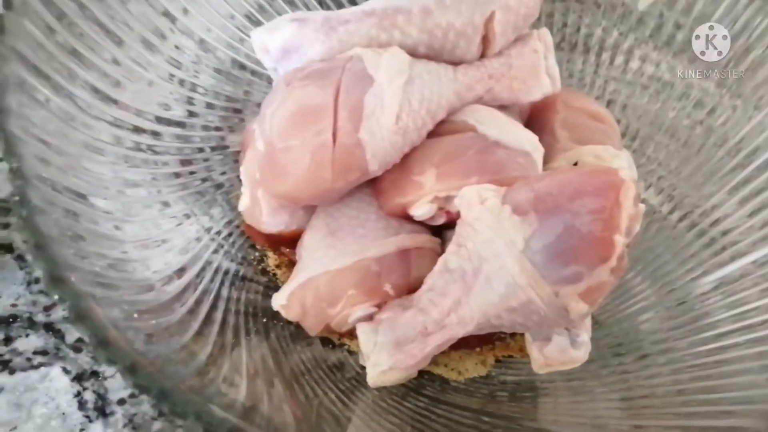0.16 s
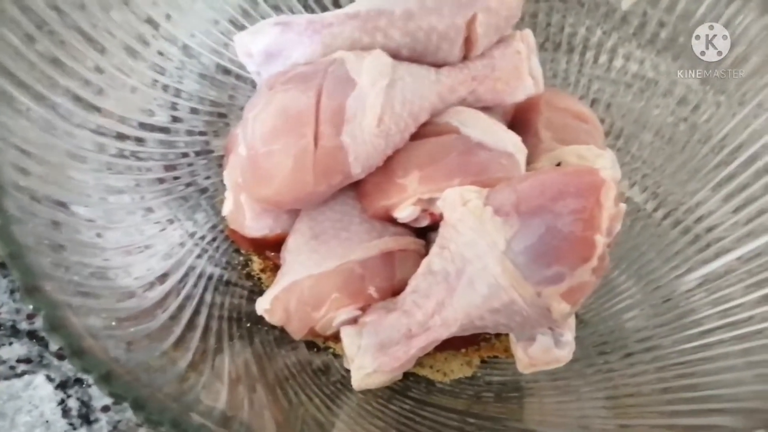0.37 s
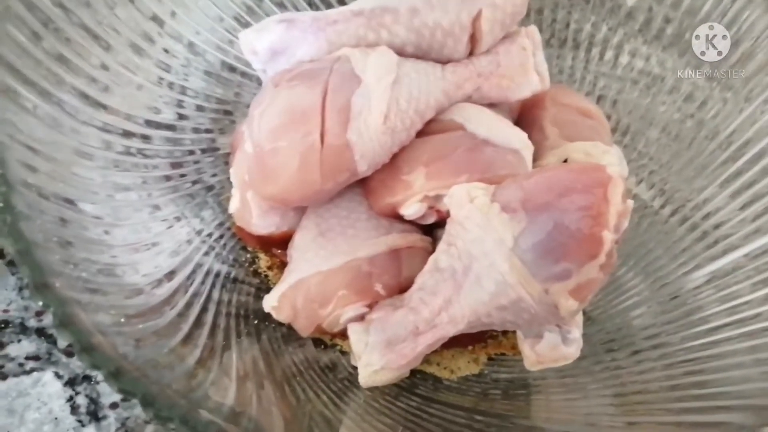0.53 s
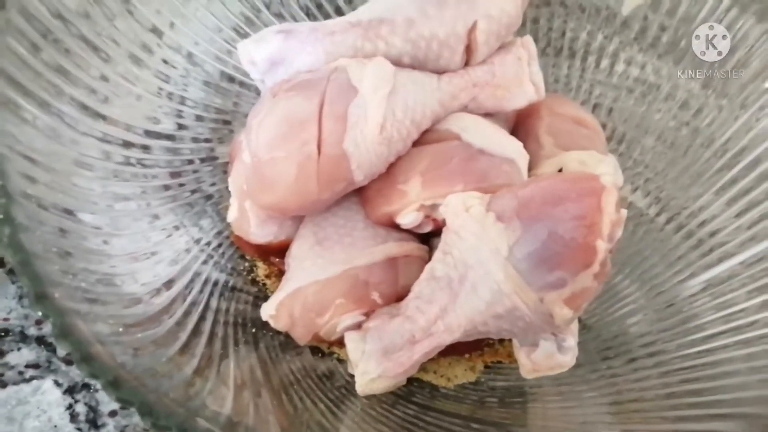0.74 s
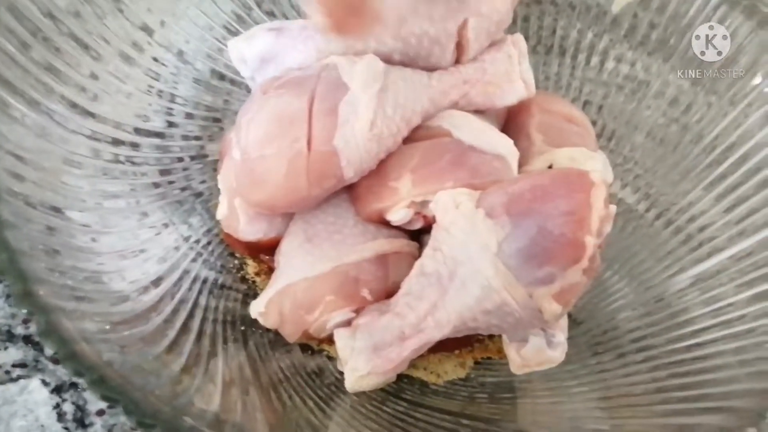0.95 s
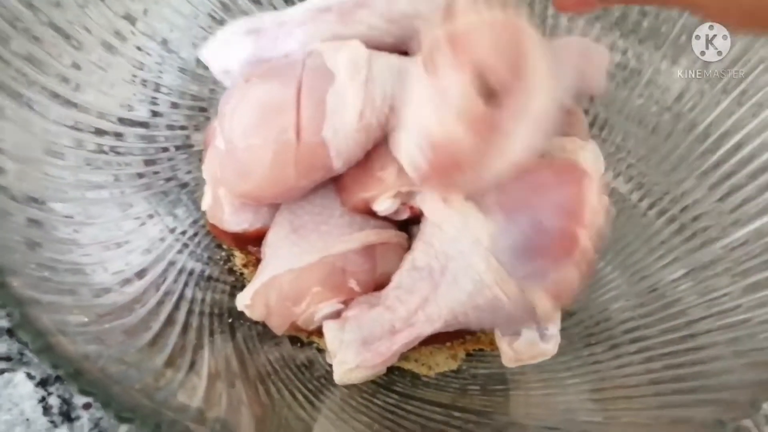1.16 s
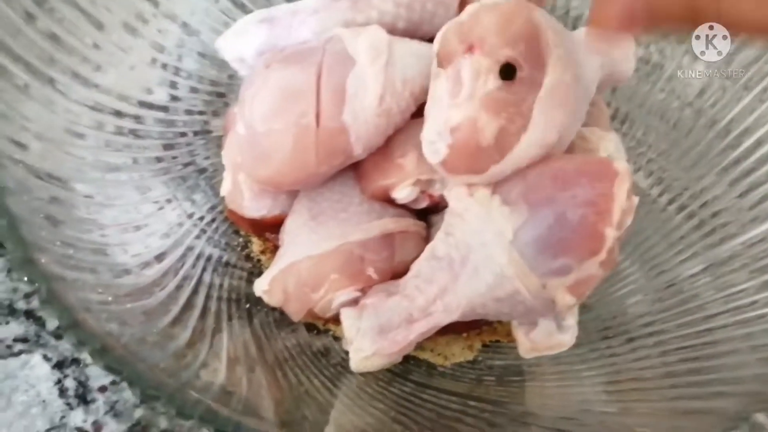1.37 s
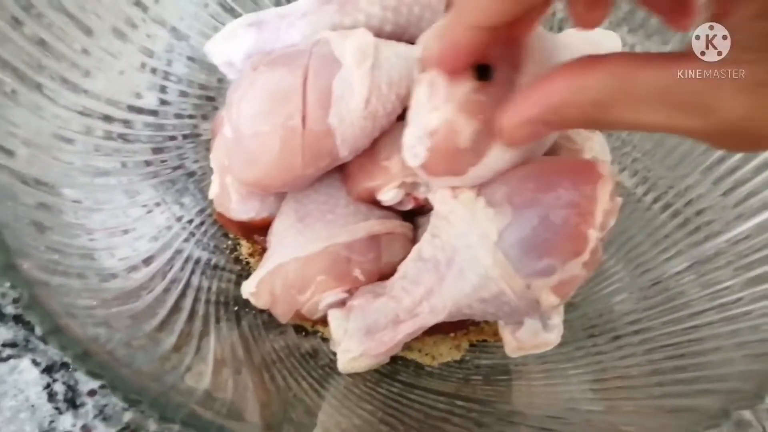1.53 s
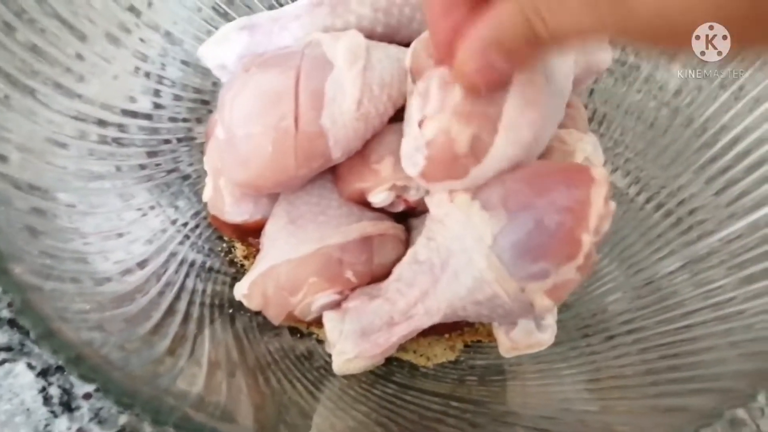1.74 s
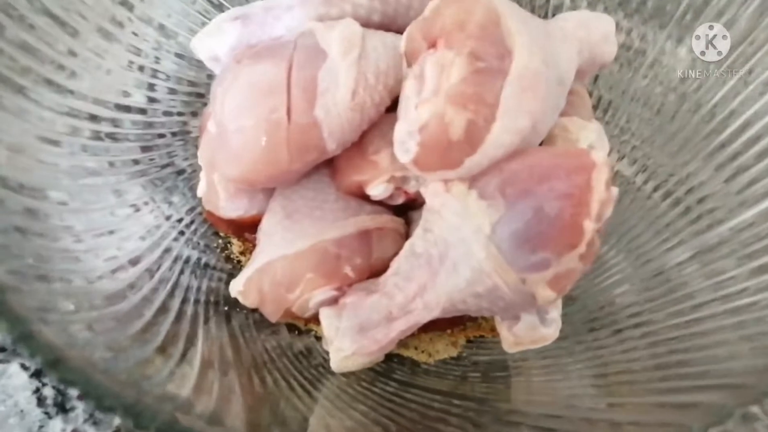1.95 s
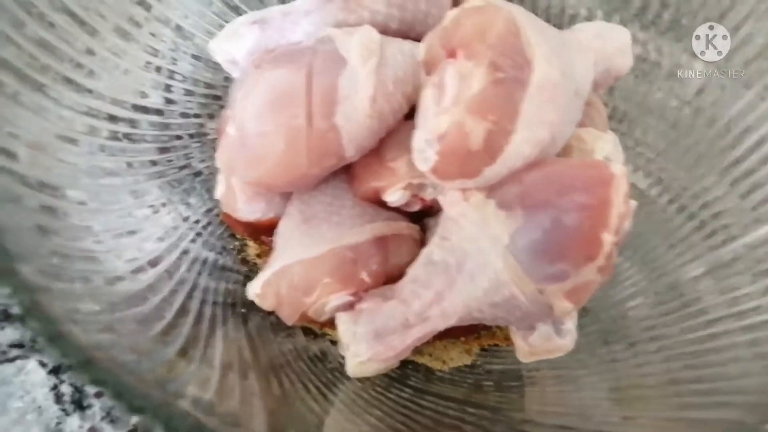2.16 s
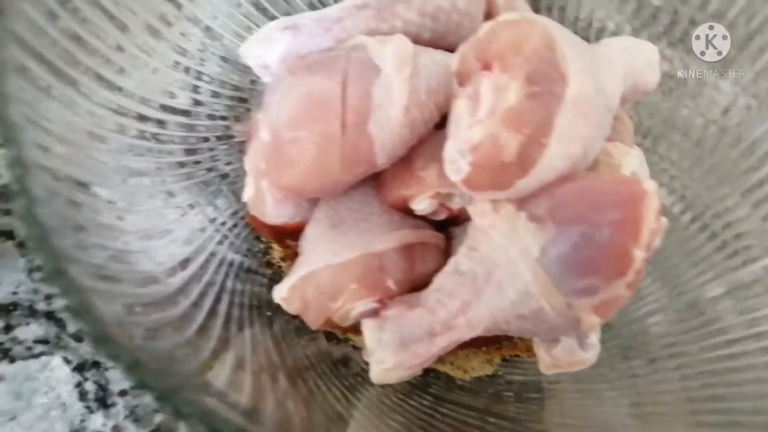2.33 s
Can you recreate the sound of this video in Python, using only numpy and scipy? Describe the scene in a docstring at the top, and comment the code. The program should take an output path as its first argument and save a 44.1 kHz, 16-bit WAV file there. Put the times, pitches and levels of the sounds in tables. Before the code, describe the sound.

Raw chicken pieces knock hollowly against a glass bowl in an echoing kitchen.

```python
"""Raw chicken into a glass bowl

A hard, echoing kitchen, heard in stereo from near the bowl, with a motor humming steadily underneath.
As the chicken is set in, two hollow knocks ring on in the room and a softer one follows. A piece then
lands on the pile with a tink of the glass and a soft thud; wet skin ticks and crackles as the hand
lets go."""
import sys
import numpy as np
from scipy import signal
from scipy.fft import rfft, irfft, next_fast_len
from scipy.io import wavfile
from scipy.ndimage import map_coordinates

SR = 44100
rng = np.random.default_rng(int(sys.argv[2]) if len(sys.argv) > 2 else 0)


def digitize_waveform(pressure):
    """Quantize a signal to 16-bit integers and store it at the path in sys.argv[1].

    Rows of a 2-D input are taken as channels; values are limited to [-1, 1].
    """
    field = np.atleast_2d(pressure).T
    bounded = np.clip(field, -1, 1)
    quanta = np.round(bounded * 32767).astype(np.int16)
    wavfile.write(sys.argv[1], SR, quanta)


N = 110250

# hollow resonances of a knock (frequency [Hz], bandwidth [Hz], level [dB])
KNOCK_MODES = [(484, 110, -8.5), (728, 205, 0.5), (1047, 200, -1), (1400, 400, -17.5), (1850, 280, -10.5),
               (2750, 400, -21.5), (5274, 830, -23), (6340, 900, -27.5), (7700, 900, -36)]
# how long the kitchen's echo holds before it fades (frequency [Hz], hold [s])
ECHO_HOLD = [(300, .2), (850, 0.29), (2500, 0.15), (5500, 0.031), (10000, .03)]
# where the echo and the crack of contact sit in the image (frequency [Hz], left over right [dB])
ROOM_BALANCE = [(300, 4.5), (750, -6), (1200, -5), (3000, 0.5), (6000, -9.5), (10000, -2.5)]
# likeness of the two channels for diffuse sound (frequency [Hz], correlation [0-1])
DIFFUSE = [(200, 0.21), (700, 0.096), (1500, 0), (8000, 0.069)]
# the same for sound that is more centred in the bass (frequency [Hz], correlation [0-1])
CENTRED = [(60, 0.59), (290, 0.36), (640, 0.27), (1400, 0.1)]

SOFT_RISE_S, SHARP_RISE_S = 0.0019, 0.0001
WALL_DELAY_S = 0.0081  # first reflections reach the microphone this much after the direct sound


def amp(db):
    """Decibels to gain."""
    return 10 ** (np.asarray(db) / 20)


def along(points, hz):
    """Read (frequency, value) points at hz on a log axis."""
    freqs, values = np.transpose(points)
    return np.interp(np.log(hz + 1), np.log(freqs + 1), values)


def band(hz, centre_hz, octaves):
    """A bell of gain around a centre frequency."""
    return np.exp(-(np.log2((hz + 1) / centre_hz) / octaves) ** 2)


def sides(db):
    """Left and right gains, the left louder by db."""
    return amp(np.array([[1], [-1]]) * db / 2)


def since(s):
    """Seconds after the moment s, zero before it."""
    return np.maximum(np.arange(N) / SR - s, 0)


def burst(s, rise, t60):
    """An envelope that rises at s and dies away by 60 dB in t60 seconds."""
    t = since(s)
    return (1 - np.exp(-t / rise)) * 1000 ** (-t / t60)


def wobble(rate):
    """A smooth random curve, rate knots a second."""
    return map_coordinates(rng.standard_normal(1024), [np.arange(N) * rate / SR + 2], mode="wrap")


def filtered(x, response):
    """Pass x through a complex response of frequency."""
    size = next_fast_len(N + SR // 2)
    return irfft(rfft(x, size) * response(np.fft.rfftfreq(size, 1 / SR)), size)[..., :N]


def noise(colour, correlation):
    """Stereo noise of rms 1 with a given colour and correlation between the channels."""
    def mid_side_gains(hz):
        angle = np.arccos(np.clip(along(correlation, hz), -1, 1)) / 2
        return colour(hz) * np.array([np.cos(angle), np.sin(angle)])

    mid, side = filtered(rng.standard_normal((2, N)), mid_side_gains)
    stereo = np.array([mid + side, mid - side])
    return stereo / np.sqrt(np.mean(stereo ** 2) + 1e-20)


def motor_hum():
    """A motor hums at multiples of its slightly drifting speed, over a trace of mains hum."""
    # motor tones (multiple of the speed, level [dB], left over right [dB])
    harmonics = [(2, -63.5, -3), (3, -65, 1), (4, -71, -6.5), (5, -73, -5.5), (6, -68, -8), (7, -67, 1),
                 (8, -66.5, -4), (9, -64, -6.5), (10, -90, -2)]
    speed_hz, drift_hz, waver_db, mains_hz = 43.37, 0.077, 1.9, 100
    turns = np.cumsum(speed_hz + drift_hz * wobble(3)) / SR
    motor = np.zeros((2, N))
    for multiple, db, pan_db in harmonics:
        gain = amp(db + waver_db * wobble(4.88)) * sides(pan_db)
        motor += gain * np.sin(2 * np.pi * (round(multiple) * turns + rng.random()))
    mains = amp(-77) * np.sin(2 * np.pi * mains_hz * since(0))
    return np.sqrt(2) * (motor + mains)


def room_tone():
    """A low rush of air in the kitchen, a little to the right of the microphone."""
    # colour of the air (frequency [Hz], level [dB])
    spectrum = [(20, -5.5), (45, -3), (75, -6), (140, -3), (200, -14), (290, -0.5), (390, -1.5),
                (470, -13.5), (650, -18), (1200, -25), (2000, -26.5), (2900, -23.5), (3900, -31.5),
                (5400, -23.5), (8000, -35), (15000, -34.5)]
    # its place in the image (frequency [Hz], left over right [dB])
    balance = [(100, -9), (400, -4.5), (2000, -2), (10000, -1)]
    air = noise(lambda hz: amp(along(spectrum, hz)), CENTRED)
    return amp(-60.5) * filtered(air, lambda hz: sides(along(balance, hz)))


def skin_peel():
    """Sticky skin comes apart in a faint, clumpy crackle."""
    # colour of the crackle (frequency [Hz], level [dB])
    spectrum = [(350, -18), (620, 11), (1100, -14), (2100, -5), (3000, -7.5), (4000, -9), (5700, 4.5),
                (7500, -3.5), (9500, -21), (15000, -22.5)]
    start_s, start_db, fade_db_per_s, clump_db = 2.384, -58, 17, 3.5
    t = since(start_s)
    level_db = start_db - fade_db_per_s * t + clump_db * wobble(170)
    return (t > 0) * amp(level_db) * noise(lambda hz: amp(along(spectrum, hz)), DIFFUSE)


def skin_snaps():
    """Films of wet skin break with small bright ticks, each with a short echo."""
    # ticks (time [s], level [dB], t60 [s], centre [Hz], width [octaves], left over right [dB])
    ticks = [(1.181, -55.5, 0.073, 5630, 0.26, -2), (1.2431, -41, 0.011, 13040, 0.42, -2),
             (1.243, -52.5, 0.019, 5920, 0.94, -3.5), (1.6513, -37.5, 0.0054, 5680, .17, -4.5),
             (1.6522, -48, 0.0064, 8960, 0.16, -5.5), (1.854, -68.5, 0.019, 7430, 0.46, 1),
             (2.3776, -41.5, 0.033, 6400, .5, 0.5), (2.379, -51.5, 0.022, 2200, 0.57, 1)]
    out = np.zeros((2, N))
    for s, db, t60, centre_hz, octaves, pan_db in ticks:
        tick = noise(lambda hz: band(hz, centre_hz, octaves), DIFFUSE)
        envelope = burst(s, SHARP_RISE_S, t60) + amp(-15) * burst(s, SHARP_RISE_S, t60=0.044)
        out += amp(db) * sides(pan_db) * envelope * tick
    return out


def flesh_thuds():
    """Soft, dull contacts: flesh lands on the pile and settles."""
    # thuds (time [s], level [dB], t60 [s], centre [Hz], width [octaves])
    contacts = [(.43, -51, 0.13, 132, 0.3), (1.1901, -35, 0.017, 1100, 1.0), (1.19, -40, 0.088, 420, 0.97),
                (1.182, -45.5, .24, 85, .9), (1.217, -38.5, .16, 115, .6), (1.385, -56.5, 0.96, 44, 1),
                (2.379, -49.5, 0.05, 650, 0.47), (2.462, -53, .2, 580, .15)]
    out = np.zeros((2, N))
    for s, db, t60, centre_hz, octaves in contacts:
        thud = noise(lambda hz: band(hz, centre_hz, octaves), CENTRED)
        out += amp(db) * burst(s, SOFT_RISE_S, t60) * thud
    return out


def glass_tink():
    """The bowl rings briefly as a piece brushes it; the wet flesh unsettles the ring."""
    # modes of the glass (frequency [Hz], relative level [dB], t60 [s])
    modes = [(1690, -4, 0.14), (3300, -14.5, 0.34), (5190, 2.5, 0.12), (5520, -10, .07), (6300, -18, .07)]
    start_s, level_db, blur_rad = 1.1805, -53, 0.46
    ring = np.zeros((2, N))
    for hz, db, t60 in modes:
        blur = blur_rad * np.array([wobble(250), wobble(250)])
        phase = 2 * np.pi * hz * since(start_s) + blur
        ring += amp(db) * burst(start_s, SOFT_RISE_S, t60) * np.sin(phase)
    return amp(level_db) * ring


def tilt(hz, db_per_octave):
    """Brighten or dull everything above a knock's main resonance."""
    main_hz = KNOCK_MODES[1][0]
    return amp(db_per_octave * np.log2(np.maximum(hz / main_hz, 1)))


def kitchen_echo(s, slope):
    """The room's answer to a knock at s: it holds, then fades in uneven waves, the treble first."""
    # broad colour of the echo (frequency [Hz], level [dB])
    spectrum = [(60, -53.5), (150, -39.5), (330, -27.5), (480, -8.5), (610, -5), (745, -0.5), (900, -1.5),
                (1075, -2.5), (1180, -10), (1340, -22.5), (1700, -15.5), (2200, -19), (2900, -17.5),
                (3900, -29.5), (5400, -18.5), (7500, -32.5), (10000, -40), (15000, -52.5)]
    # narrow resonances of the room (frequency [Hz], width [Hz], level [dB])
    resonances = [(754, 24, -4), (1030, 14, -4), (1080.5, 12, -1)]
    # reverberation time (frequency [Hz], t60 [s])
    decay_times = [(200, 1.0), (850, 1.51), (2500, 1.74), (5500, 1.43), (10000, .6)]
    swell_db = 1.5

    def colour(hz):
        peaks = sum(amp(db) * np.exp(-((hz - centre) / width) ** 2) for centre, width, db in resonances)
        return (amp(along(spectrum, hz)) + peaks) * tilt(hz, slope / 2)

    hz, t, wash = signal.stft(noise(colour, DIFFUSE), SR, nperseg=256)
    fading_s = np.maximum(t - s - along(ECHO_HOLD, hz)[:, None], 0)
    decay = 1000 ** (-fading_s / along(decay_times, hz)[:, None])
    balance = sides(along(ROOM_BALANCE, hz))[:, :, None]
    tail = signal.istft(wash * decay * balance, SR, nperseg=256)[1][:, :N]
    build_up = 1 - np.exp(-since(s) / WALL_DELAY_S)
    return tail * build_up * amp(swell_db * wobble(25))


def wall_reflections(ring):
    """Hard surfaces near the bowl throw back a short, dense scatter of the ring."""
    scatter = rng.standard_normal((2, N)) * burst(WALL_DELAY_S, SHARP_RISE_S, t60=0.018)
    scatter /= np.linalg.norm(scatter[0])
    return amp(-10) * signal.fftconvolve(ring[None], scatter, axes=1)[:, :N]


def hollow_ring(s, slope):
    """A push at s and its duller rebound excite short, hollow resonances; the peak is 1."""
    rebound_s, rebound_share, rebound_edge_hz = 0.002656, 0.78, 7500

    def response(hz):
        modes = sum((-1) ** k * amp(db) * 1j * hz * width / (centre ** 2 - hz ** 2 + 1j * hz * width)
                    for k, (centre, width, db) in enumerate(KNOCK_MODES))
        delay = np.exp(-2j * np.pi * hz * rebound_s)
        rebound = rebound_share * delay / np.hypot(1, hz / rebound_edge_hz)
        return -modes * tilt(hz, slope) * (1 + rebound)

    push = np.zeros(N)
    push[round(s * SR)] = 1
    ring = filtered(push, response)
    return ring / np.abs(ring).max()


def contact_crack(s, slope):
    """The sharp burst of noise at the instant of contact."""
    # colour of the crack (frequency [Hz], gain [dB])
    spectrum = [(100, -31), (400, -8.5), (1500, 16), (3200, -3.5), (4000, -6.5), (6500, -0.5), (8000, -10),
                (9500, -18), (14500, -20.5)]
    contact = noise(np.ones_like, CENTRED) * burst(s, SHARP_RISE_S, t60=0.025)
    colour = lambda hz: amp(along(spectrum, hz)) * tilt(hz, slope)
    return filtered(contact, lambda hz: colour(hz) * sides(along(ROOM_BALANCE, hz)))


def thump(s):
    """The weight behind a knock: a short puff of low noise."""
    low = noise(lambda hz: band(hz, centre_hz=284, octaves=1.3), CENTRED)
    return amp(-25) * burst(s, SOFT_RISE_S, t60=0.041) * low


def bowl_knocks():
    """Each knock reaches the microphone as ring, crack and thump; near walls and the room answer."""
    # knocks (time [s], level [dB], treble slope [dB/octave], left over right [dB],
    #         relative echo gain [dB], relative crack gain [dB])
    strikes = [(.238, -11.5, 0.44, 9.5, -27, -9.5), (0.4131, -6.5, -1.06, -0.5, -31.5, -13),
               (0.7368, -27, -3, -13.5, -31.5, -27.5)]
    arrival_s = np.array([[0], [0.00028]])  # the ring reaches the right capsule a little later
    out = amp(-67) * kitchen_echo(-ECHO_HOLD[1][1], 0)  # the room already rings faintly at the start
    for s, db, slope, pan_db, echo_db, crack_db in strikes:
        ring = hollow_ring(s, slope)
        ring_at_mic = filtered(ring, lambda hz: np.exp(-2j * np.pi * hz * arrival_s))
        direct = ring_at_mic + amp(crack_db) * contact_crack(s, slope) + thump(s)
        near = sides(pan_db) * (direct + wall_reflections(ring))
        out += amp(db) * (near + amp(echo_db) * kitchen_echo(s, slope))
    return out


def scene():
    """The kitchen and the bowl as they reach the stereo microphone."""
    background = motor_hum() + room_tone()
    return background + bowl_knocks() + glass_tink() + flesh_thuds() + skin_snaps() + skin_peel()


def record(dry):
    """The recorder keeps nothing above its band limit."""
    top_hz = 15450
    return filtered(dry, lambda hz: hz < top_hz)


dry = scene()
out = record(dry)
digitize_waveform(out)
```